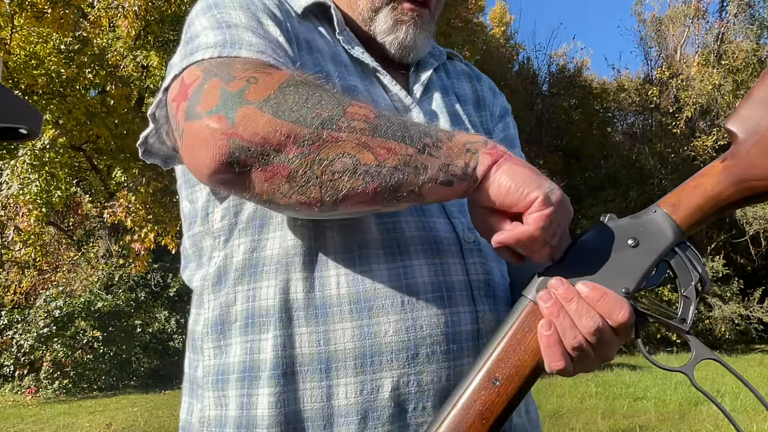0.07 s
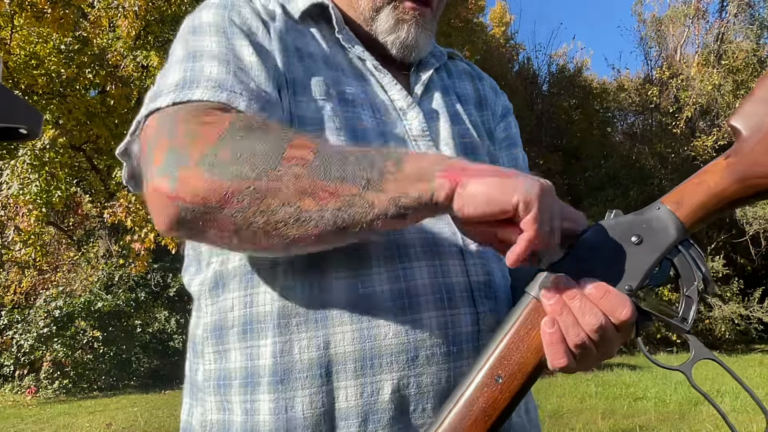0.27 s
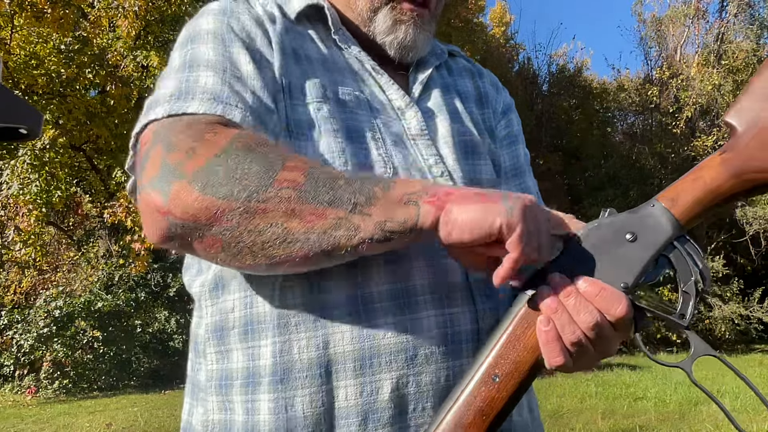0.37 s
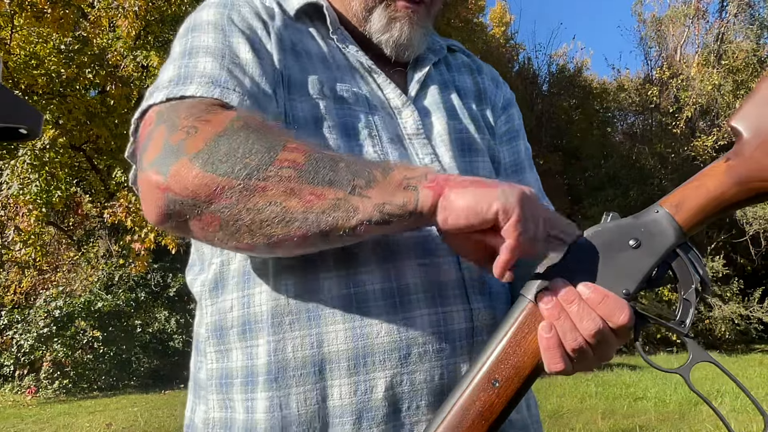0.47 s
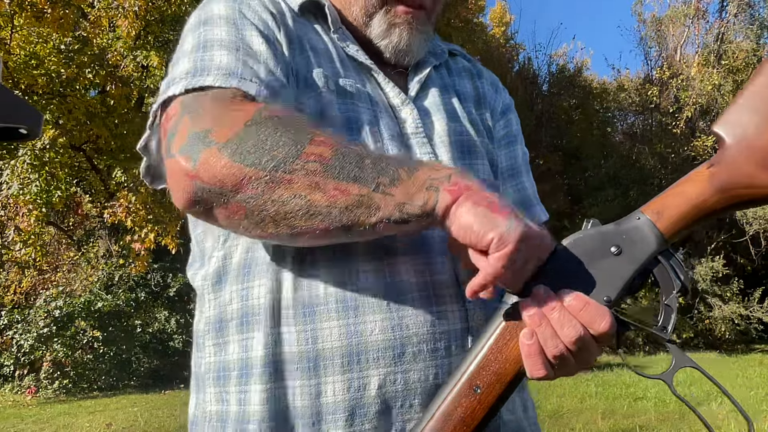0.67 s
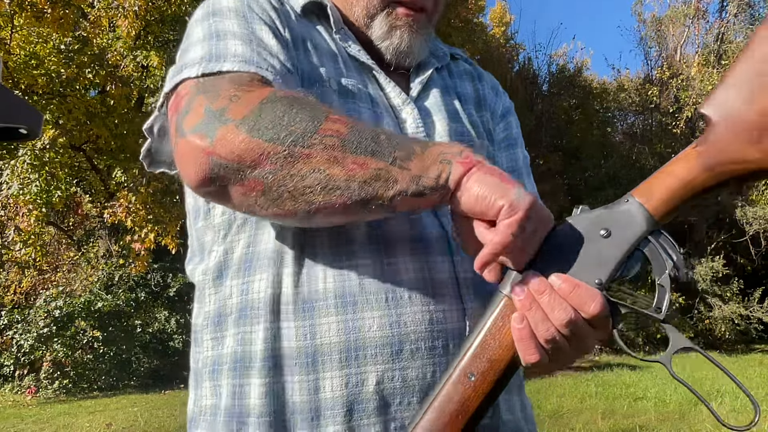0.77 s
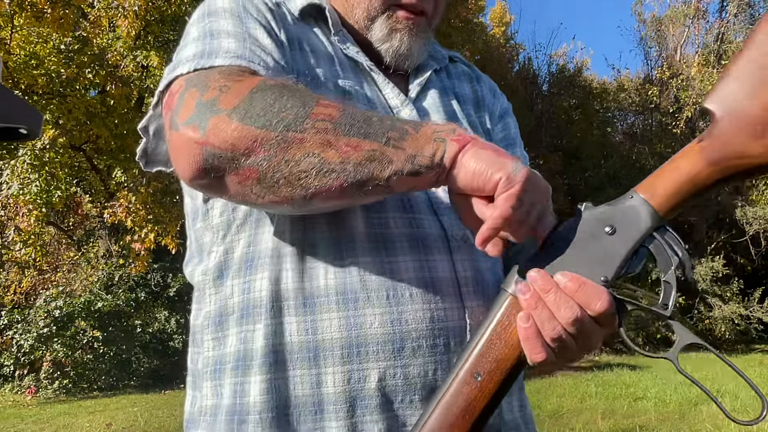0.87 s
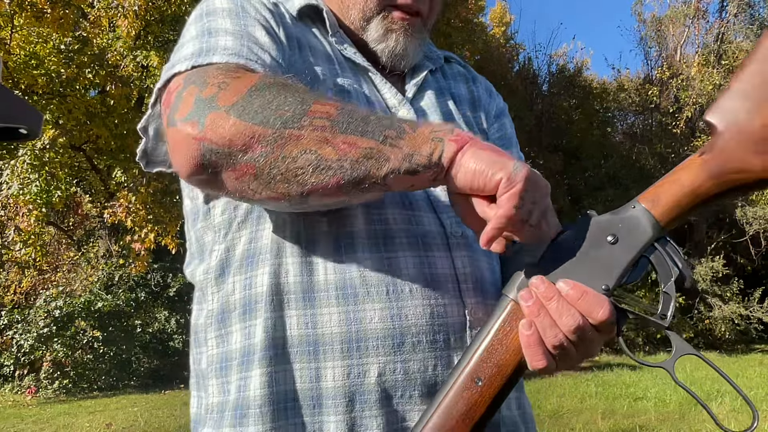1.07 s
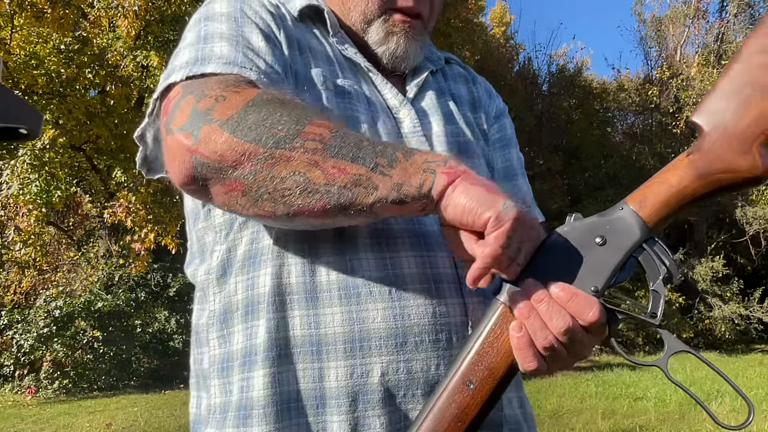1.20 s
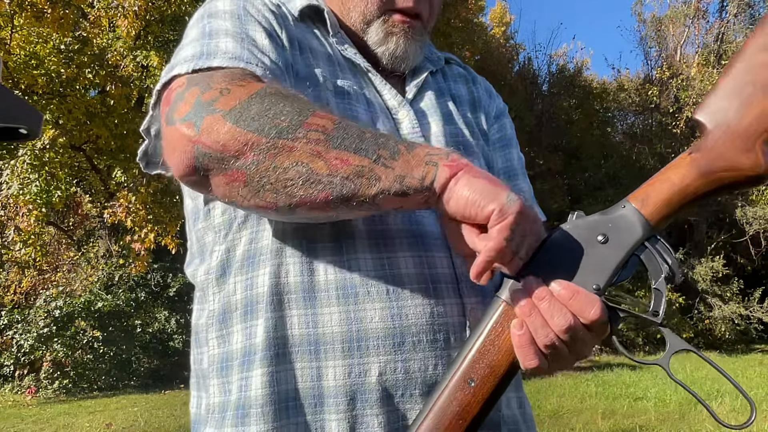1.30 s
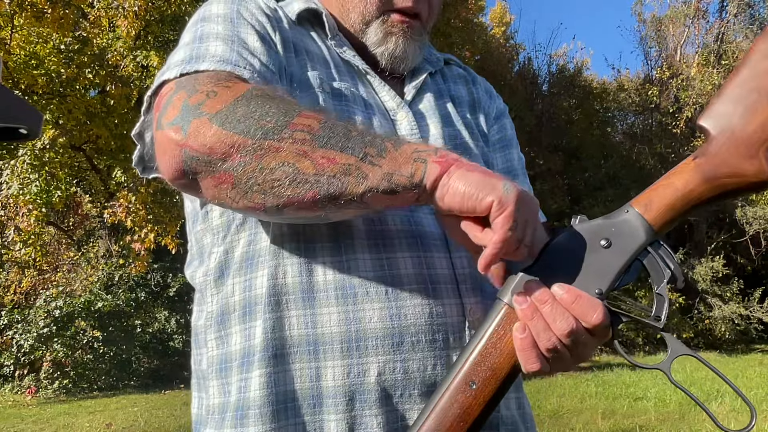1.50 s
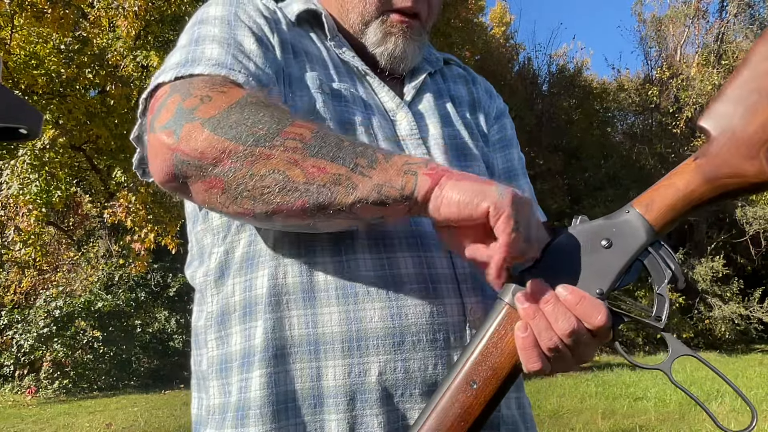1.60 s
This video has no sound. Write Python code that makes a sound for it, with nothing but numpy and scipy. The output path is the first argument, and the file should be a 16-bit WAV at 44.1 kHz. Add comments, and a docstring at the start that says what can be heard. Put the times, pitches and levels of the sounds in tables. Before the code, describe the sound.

Gritty metallic clicks and clacks as shells are pushed into a rifle's steel action in quiet open air

```python
"""Shells are pushed one by one into the steel action of a lever gun, outdoors, close to a two-port microphone.
Each push scrapes in rough grains and sets off clicks; both drive one shell-and-steel body as gritty force,
and the clicks also ring its modes as sines. Behind them: quiet open air (coloured noise),
a wavering low drone (narrow noise bands) and one faint falling squeak (a gliding sine)."""
import sys
import numpy as np
from scipy import signal
from scipy.fft import rfft, irfft, next_fast_len
from scipy.io import wavfile

SR = 44100
rng = np.random.default_rng(int(sys.argv[2]) if len(sys.argv) > 2 else 0)


def digitize_waveform(pressure):
    """Quantize a signal to 16-bit integers and store it at the path in sys.argv[1].

    Rows of a 2-D input are taken as channels; values are limited to [-1, 1].
    """
    field = np.atleast_2d(pressure).T
    bounded = np.clip(field, -1, 1)
    quanta = np.round(bounded * 32767).astype(np.int16)
    wavfile.write(sys.argv[1], SR, quanta)


N = 72765

# modes of shell and action: f/Hz, level/dB, t60/s
MODES = [(340, -50.5, 0.4), (450, -47, .022), (718, -43.5, 0.062), (965, -30.5, 0.1), (1056, -32.5, 0.06),
         (1396, -30, 0.09), (1612, -23, 0.061), (1684, -28, 0.074), (2117, -30.5, 0.019),
         (2526, -23.5, 0.0301), (3177, -37, 0.21), (3400, -16, 0.036), (3786, -33, 0.14),
         (4252, -31.5, 0.04), (7130, -38.5, 0.015), (8400, -35.5, 0.079), (9280, -22.5, 0.011)]


def amp(db):
    """Amplitude factor of a level in dB."""
    return 10 ** (np.asarray(db, float) / 20)


def evened(x):
    """Scale to RMS 1."""
    return x / np.sqrt(np.mean(x ** 2) + 1e-20)


def read(points, hz):
    """Interpolate a (f/Hz, value) table over log frequency."""
    f, value = np.transpose(points)
    return np.interp(np.log(hz + 1), np.log(f + 1), value)


def ports(a, b, likeness, phase, balance):
    """Two microphone ports: partly alike, with a phase and level offset by frequency."""
    size = next_fast_len(N + 512)
    hz = np.fft.rfftfreq(size, 1 / SR)
    spec_a, spec_b = rfft(a, size), rfft(b, size)
    same = np.clip(read(likeness, hz), 0, 1)
    f, lead_rad = np.transpose(phase)
    side = amp(read(balance, hz) / 2)
    left = spec_a * side * np.exp(1j * np.interp(hz, f, lead_rad))
    right = (same * spec_a + np.sqrt(1 - same ** 2) * spec_b) / side
    return irfft(np.array([left, right]), size)[:, :N]


def air():
    """Steady outdoor hush: coloured noise, its likeness between the ports set by frequency."""
    # spectrum: f/Hz, density/dB per Hz
    spectrum = [(15, -33), (25, -17), (103, -1.5), (410, -3), (706, 5), (1150, -3.5), (1550, -23),
                (1830, -15), (2980, -9), (3910, -15.5), (6730, -36.5), (12600, -34.5), (16500, -61)]
    # phase: f/Hz, left lead/rad
    phase = [(0, 0.5), (1380, 0.5), (4820, -6), (7410, -9.5), (11000, -20.5), (16500, -25)]
    # balance: f/Hz, left minus right/dB
    balance = [(60, -10.5), (180, -5.5), (550, 2), (1650, -8), (4970, 6.5), (15000, 3.5)]
    # likeness of ports: f/Hz, correlation/1 (held to 0-1)
    likeness = [(60, 1), (240, 0.93), (950, -0.33), (3770, -0.27), (15000, 0.19)]
    level_db = -61
    colour = amp(read(spectrum, np.fft.rfftfreq(N, 1 / SR)))
    a, b = irfft(rfft(rng.standard_normal((2, N))) * colour, N)
    return amp(level_db) * evened(ports(a, b, likeness, phase, balance))


def drone():
    """Low hum that wavers, as narrow bands of noise do."""
    # hum bands: centre f/Hz, 1/e half-width/Hz, level/dB (mean of ports)
    hum_bands = [(69.4, 21, -69.5), (83.8, 24, -66), (122.1, 10, -68)]
    balance_db = -4.5  # left minus right
    hz = np.fft.rfftfreq(N, 1 / SR)
    hum = np.zeros(N)
    for f, width_hz, db in hum_bands:
        bell = np.exp(-((hz - f) / width_hz) ** 2)
        hum += amp(db) * evened(irfft(rfft(rng.standard_normal(N)) * bell, N))
    return hum * amp([[balance_db / 2], [-balance_db / 2]])


def squeak():
    """A faint thin tone that falls: one sine of gliding frequency."""
    # glide: t/s, f/Hz, RMS level/dB
    glide = [(0.0, 14018, -85), (0.048, 12829, -84), (0.09, 13160, -82), (0.12, 12000, -96)]
    t = np.arange(N) / SR
    s, hz, db = np.transpose(glide)
    level = np.sqrt(2) * amp(np.interp(t, s, db, right=-200))
    phase_rad = 2 * np.pi * np.cumsum(np.interp(t, s, hz)) / SR
    return level * np.sin(phase_rad)


def body():
    """Impulse answer of shell and action: broad colour, short hiss and modes, in three bands of energy 1."""
    # broad colour: f/Hz, level/dB
    colour = [(150, -22.5), (500, 9), (900, 10), (1600, 13.5), (2200, 16), (3300, 11.5), (4500, 14),
              (5400, 9), (7000, 8), (8500, 10.5), (10000, 0.5), (11500, 2.5), (15800, -9.5), (16500, -40.5)]
    # band edges, low to high: lower f/Hz, upper f/Hz
    band_hz = [(250, 1780), (1950, 5500), (5500, 17000)]
    rattle_db, rattle_t60_s = -15.5, 0.031
    grip_shift, grip_db = 1.21, 8  # random spread of the modes: frequency (in 1/t60), level
    size = 16384
    hz = np.abs(np.fft.fftfreq(size, 1 / SR))
    log_gain = np.log(amp(read(colour, hz)))
    taps = np.fft.ifft(np.exp(np.conj(signal.hilbert(log_gain)))).real  # minimum phase: causal
    t = np.arange(size) / SR
    hiss = amp(rattle_db - 60 * t / rattle_t60_s) * rng.standard_normal(size)
    taps = taps + signal.fftconvolve(taps, hiss)[:size]
    for f, db, t60 in MODES:
        level_draw, shift_draw = rng.standard_normal(2)
        decay = amp(db + grip_db * level_draw - 60 * t / t60)
        taps = taps + decay * np.sin(2 * np.pi * (f + grip_shift * shift_draw / t60) * t)
    answers = []
    for edges in band_hz:
        sos = signal.butter(N=3, Wn=edges, btype="band", fs=SR, output="sos")
        band = signal.sosfilt(sos, taps)
        answers.append(band / np.linalg.norm(band))
    return answers


def scrape():
    """Force of the rubbing per band, broken into uneven grains over a smooth share."""
    # scrape of each push: t/s, low/dB, middle/dB, high/dB
    pushes = [
        [(0.165, -71, -76, -83), (0.178, -49, -38.5, -41.5), (0.19, -37, -27, -26.5), (0.205, -36, -21.5, -19),
         (0.22, -29, -17, -14), (0.227, -22.5, -19.5, -18.5), (0.232, -38.5, -34, -43),
         (0.241, -29.5, -21, -21), (0.252, -46.5, -43, -43.5), (0.275, -65.5, -52.5, -56),
         (0.31, -65.5, -54.5, -54.5), (0.41, -62, -73.5, -88)],
        [(0.42, -68, -63.5, -80), (0.452, -57, -59.5, -65), (0.458, -50, -43, -50), (0.49, -48, -36, -43.5),
         (0.52, -46, -39, -45.5), (0.535, -40.5, -35.5, -32), (0.55, -40, -25.5, -32), (0.565, -34, -32, -22.5),
         (0.58, -47, -45, -54), (0.605, -60, -57.5, -69), (0.625, -54, -45, -54), (0.65, -44, -47.5, -49.5),
         (0.675, -60, -58, -67), (0.71, -72, -72.5, -76)],
        [(0.805, -63.5, -63, -73.5), (0.816, -36.5, -40.5, -49.5), (0.835, -56.5, -37, -42.5),
         (0.843, -39, -31.5, -35.5), (0.855, -40, -30.5, -38), (0.868, -35.5, -35.5, -24),
         (0.885, -40, -24, -30.5), (0.91, -41, -30, -31), (0.94, -42, -38, -39.5), (0.96, -53, -43.5, -51),
         (1.0, -76, -62, -65)],
        [(1.01, -57, -50.5, -61), (1.04, -56.5, -43.5, -51), (1.053, -45, -41, -45), (1.07, -45.5, -45, -51),
         (1.11, -58, -36.5, -47), (1.125, -39, -44.5, -31.5), (1.14, -45, -22.5, -35.5),
         (1.15, -38.5, -34.5, -53), (1.175, -51.5, -42, -43), (1.195, -47.5, -48, -51.5),
         (1.215, -72, -75, -68.5), (1.25, -74, -74, -75)],
        [(1.31, -67, -101, -68), (1.325, -66, -53.5, -61), (1.345, -51, -43, -48), (1.36, -51, -27.5, -33),
         (1.39, -41, -38.5, -45), (1.42, -49, -42.5, -47), (1.435, -47, -61, -68.5), (1.46, -55, -66, -67.5),
         (1.5, -64.5, -67, -81)],
        [(1.56, -65.5, -74, -103), (1.59, -55.5, -52.5, -59), (1.62, -53, -50.5, -57), (1.65, -51.5, -47, -51)],
    ]
    # a faint high ring fading as the scene opens, driven through the scrape force: t/s, low/dB, middle/dB,
    # high/dB
    opening = [(0, -60.5, -58.5, -56.5), (.04, -95, -74, -87)]
    grains_per_s, grain_spread_db, grain_s, smooth_share = 380, 4, .0012, .36
    t = np.arange(N) / SR
    s, *bands_db = np.concatenate([opening, *pushes]).T
    level = np.array([amp(np.interp(t, s, db)) for db in bands_db])
    sizes = amp(grain_spread_db * np.minimum(rng.exponential(1, N), 4))
    hits = sizes * (rng.random(N) < grains_per_s / SR)
    grains = evened(signal.lfilter([1], [1, -np.exp(-1 / (grain_s * SR))], hits))
    return level * evened(smooth_share + (1 - smooth_share) * grains)


def clicks():
    """Each click: a force burst per band, plus a ping of its favoured modes over a faint free ring of all."""
    # clicks: t/s, level/dB, low knock re level/dB, middle clack re level/dB,
    # high tick re level/dB, favoured ring f/Hz
    hits = [(0.188, -14, -25.5, -8.5, -10, 1670), (0.195, -5.5, -15.5, -2, -5.5, 1490),
            (0.202, -7, -20, -11, -6.5, 1573), (0.217, -5.5, -14, -15, -31.5, 3363),
            (0.218, -10, -10.5, -25, -16, 750), (0.2246, -4, -12, -7, 3, 1063),
            (0.237, -26, -12, -2, -6.5, 1055), (0.432, -38.5, -3, -2.5, -4, 958),
            (0.487, -19, -12, -11.5, -7.5, 1640), (0.501, -14, -25, -7.5, -7.5, 1620),
            (0.553, -8.5, -16.5, -12, -2, 4240), (0.559, -7.5, -18, -4.5, -3, 1600),
            (0.562, -17.5, -20, -21, -11, 440), (0.592, -26.5, -16, -6, 1.5, 3160),
            (0.637, -19.5, -15.5, -8.5, -2, 1660), (0.742, -37.5, -6.5, -7, -23, 1640),
            (0.812, -25, -15.5, -1.5, -8.5, 3360), (0.83, -26.5, -2.5, -21, -23, 3260),
            (0.846, -3.5, -42, -2.5, -1, 4200), (0.859, 1, -33.5, -6.5, -4.5, 1320),
            (0.872, -10.5, -18, -10, -3, 1600), (0.897, -9, -26, -13, 0, 3660),
            (0.923, -14.5, -30, -5.5, -10, 4300), (0.933, -14, -18, -3, -6, 930),
            (1.058, -16.5, -27, -2.5, -5.5, 1600), (1.059, -14.5, -13, -5.5, 0, 2520),
            (1.122, -17.5, -13, -22, -11, 3950), (1.132, -13, -15, -6, -1.5, 1710),
            (1.142, -13, -15.5, -10, 1.5, 950), (1.145, -14, -17, -16, -27, 440),
            (1.152, -22, -30, -28, -6, 1400), (1.184, -17.5, -19, -3.5, -6.5, 1700),
            (1.274, -26, -14, -6.5, -9, 3410), (1.355, -6.5, -24, -39, -4, 3980),
            (1.368, -11, -21, -28, -30, 3240), (1.38, -12, -20, -24, -27, 3400),
            (1.408, -17.5, -31.5, -3.5, -11.5, 1670), (1.457, -36, -3.5, -1.5, -45.5, 1700)]
    # force decay time constant, low to high band: tau/s
    fall_s = [.0025, .0018, .0018]
    rise_s = 0.0018
    # modes near the favoured f, reach in ln(f), ring out faster by the damping of the hand
    ping_db, ping_reach, ping_damp = -11.5, 0.049, 1.75
    free_db = -10.5
    t = np.arange(9000) / SR
    force, pings = np.zeros((3, N + len(t))), np.zeros(N + len(t))
    rise = np.minimum(t / rise_s, 1)
    for s, level_db, *rel_db, favoured_hz in hits:
        start = round(s * SR)
        at = slice(start, start + len(t))
        for k, fall in enumerate(fall_s):
            force[k, at] += amp(level_db + rel_db[k]) * rise * np.exp(-t / fall)
        for f, db, t60 in MODES:
            near = np.exp(-(np.log(f / favoured_hz) / ping_reach) ** 2)
            ping = near * amp(ping_db - 60 * ping_damp * t / min(t60, .08))
            free = amp(free_db + db - 60 * t / t60)
            pings[at] += rise * amp(level_db) * (ping + free) * np.sin(2 * np.pi * f * t)
    return force[:, :N], pings[:N]


def gun():
    """Scrape and clicks drive the body as gritty force; three grips on it take turns, shifting its modes."""
    # phase: f/Hz, left lead/rad
    phase = [(0, 0), (1380, -0.4), (1890, -2.8), (2580, -3.2), (3100, -5.2), (5000, -9.1), (7410, -9.6),
             (8960, -12.3), (10200, -13.1), (11000, -15.5), (12100, -16.4), (13200, -16.1), (14900, -19.0),
             (16500, -18.3)]
    # balance: f/Hz, left minus right/dB
    balance = [(60, -2.5), (130, -10), (290, 1), (640, 6.5), (1410, 5), (3100, -2), (6820, 1.5), (15000, 0)]
    likeness, grip_s = 0.72, .035
    blows, pings = clicks()
    force = np.hypot(scrape(), blows)
    grit = rng.standard_normal((2, N))
    out = np.array([pings, pings])
    turn = np.arange(N) / (SR * grip_s)
    for k in range(3):
        window = np.sqrt(8 / 9) * np.cos(np.pi * (turn + k) / 3) ** 2  # the three powers sum to 1
        for band_force, answer in zip(force, body()):
            drive = band_force * window * grit
            out = out + signal.oaconvolve(drive, answer[None], axes=1)[:, :N]
    return ports(*out, [(0, likeness), (SR, likeness)], phase, balance)


def scene():
    """Sum of all sources at the two ports."""
    return air() + drone() + squeak() + gun()


def record(dry):
    """Band limit of the recorder: linear-phase low-pass."""
    edge_hz = 16400
    taps = signal.firwin(511, edge_hz, window=("kaiser", 9), fs=SR)
    return signal.oaconvolve(dry, taps[None], "same")


dry = scene()
out = record(dry)
digitize_waveform(out)
```